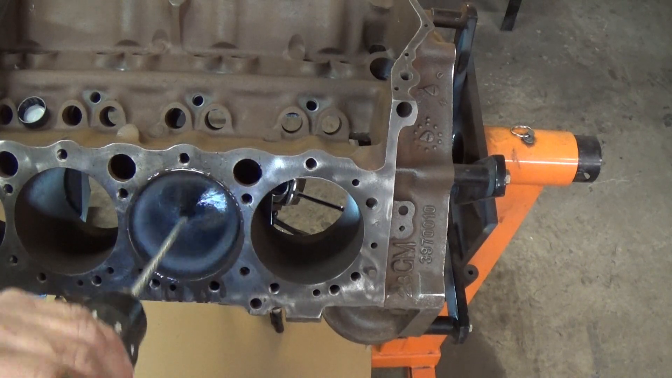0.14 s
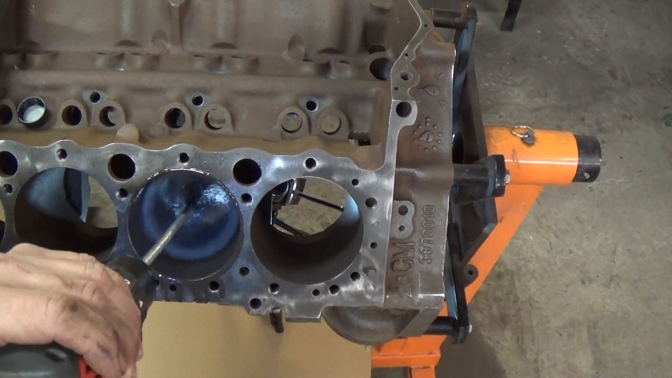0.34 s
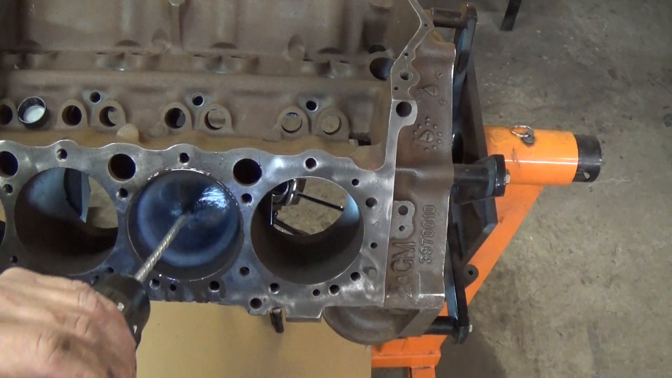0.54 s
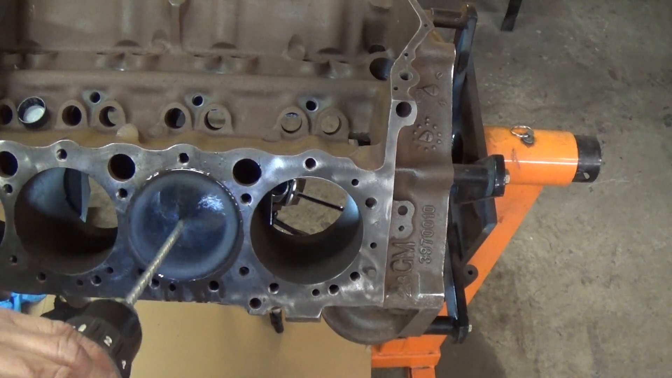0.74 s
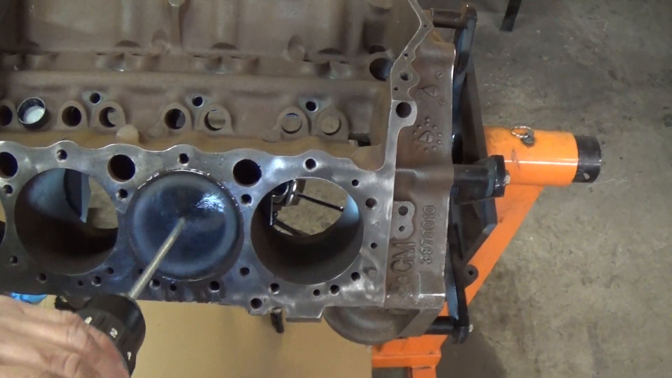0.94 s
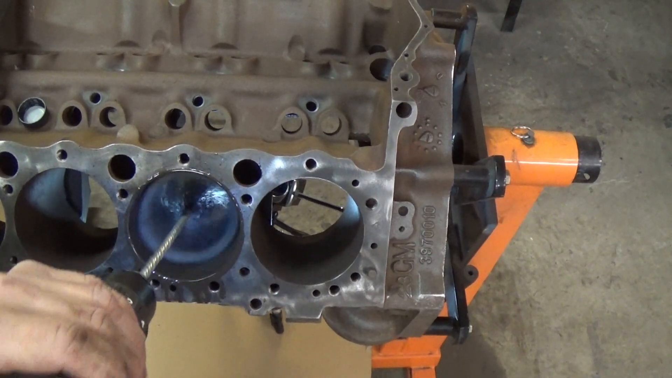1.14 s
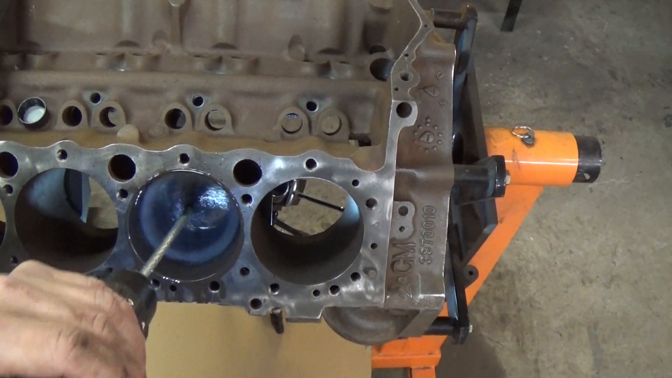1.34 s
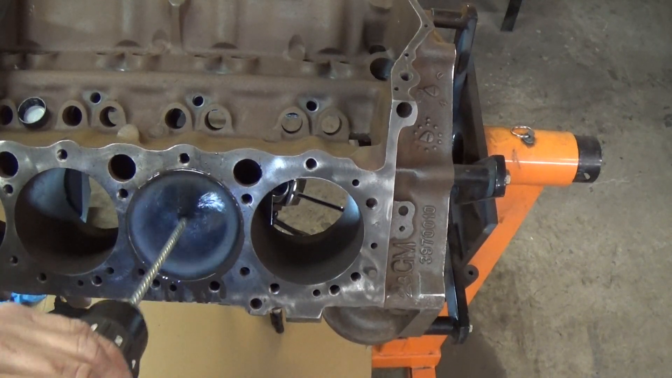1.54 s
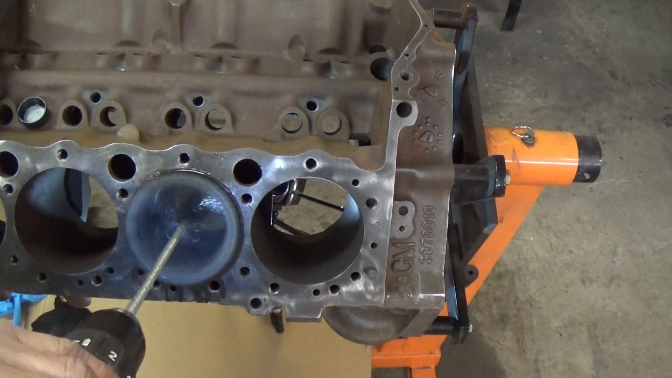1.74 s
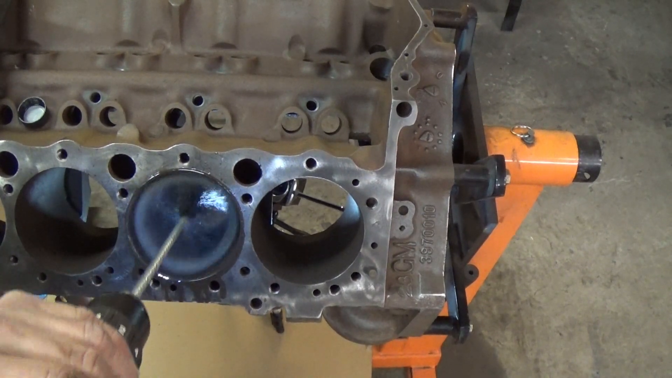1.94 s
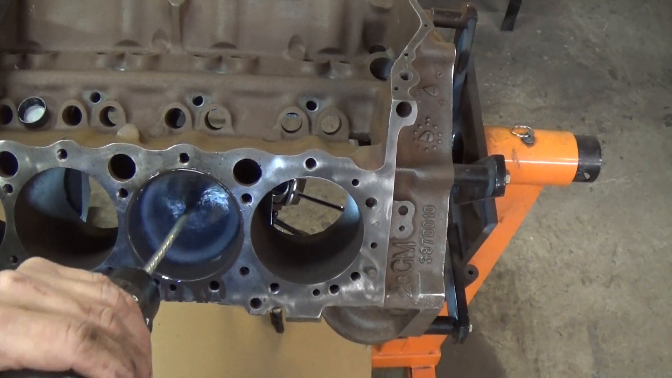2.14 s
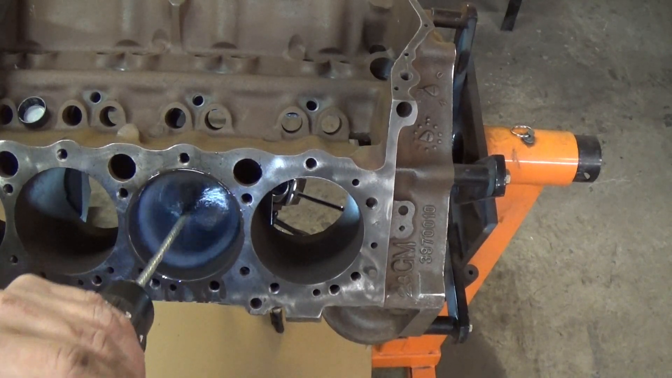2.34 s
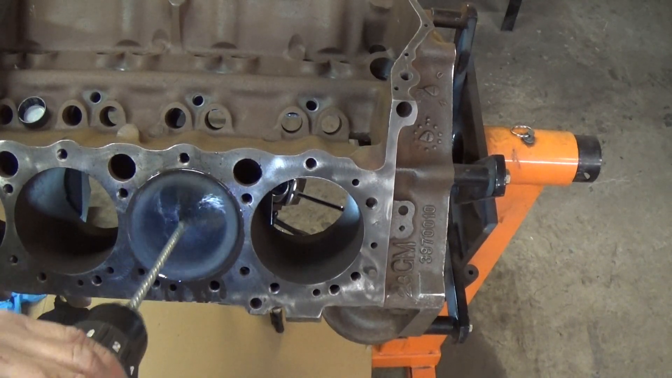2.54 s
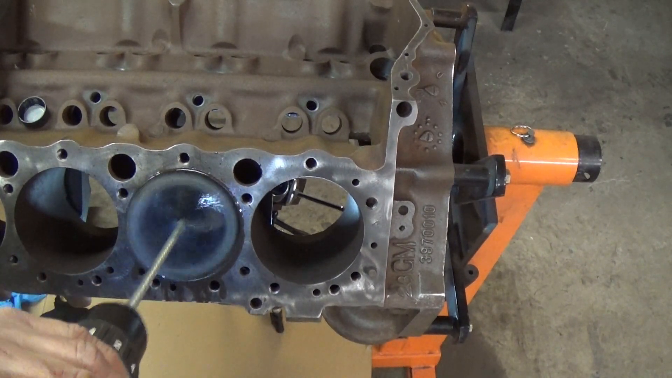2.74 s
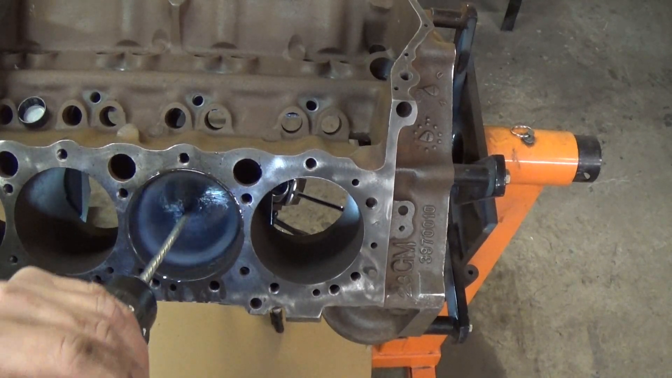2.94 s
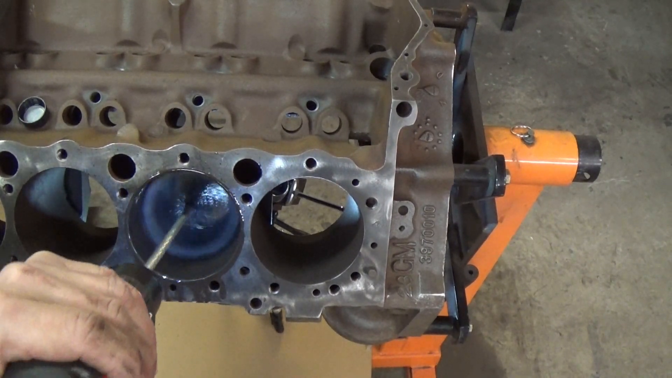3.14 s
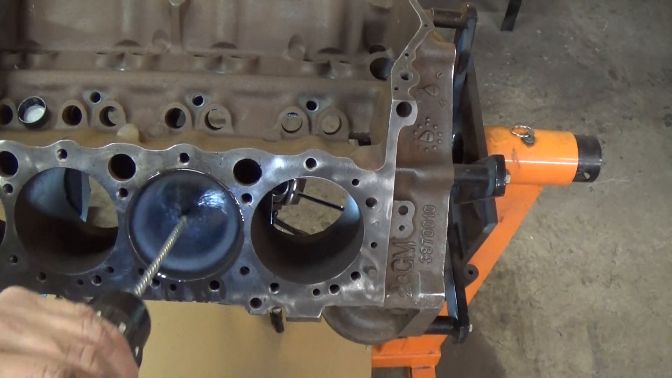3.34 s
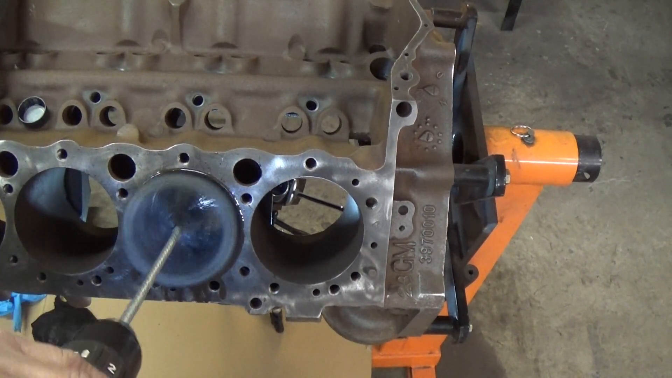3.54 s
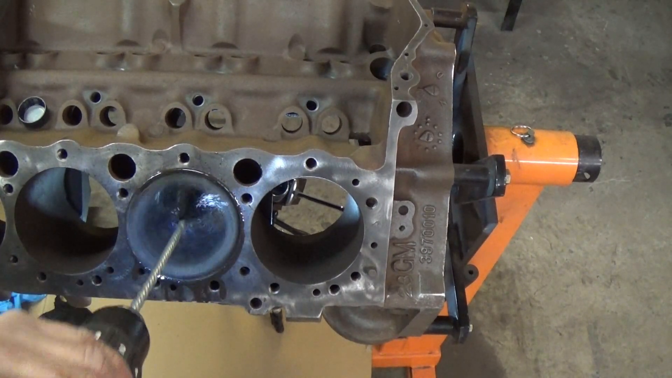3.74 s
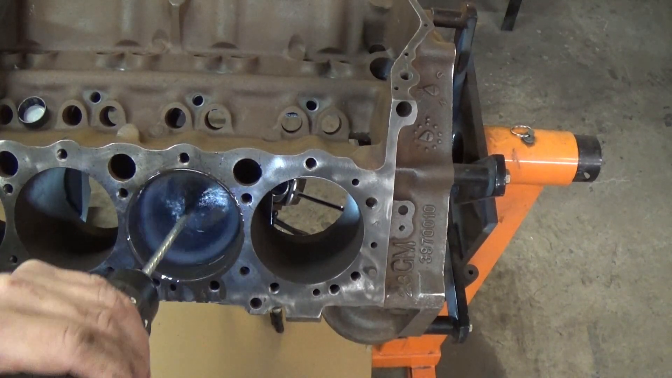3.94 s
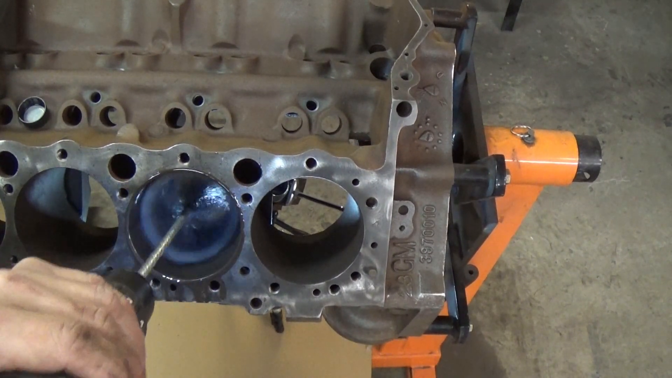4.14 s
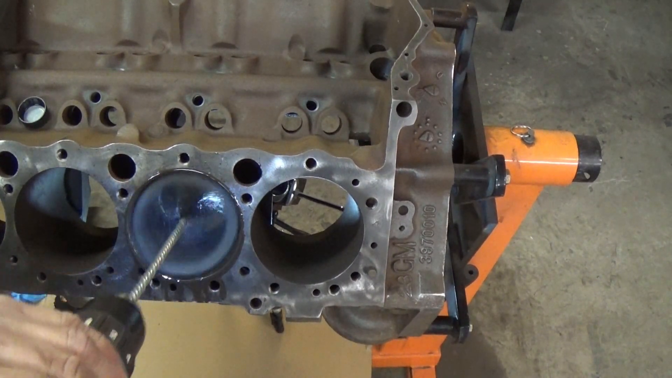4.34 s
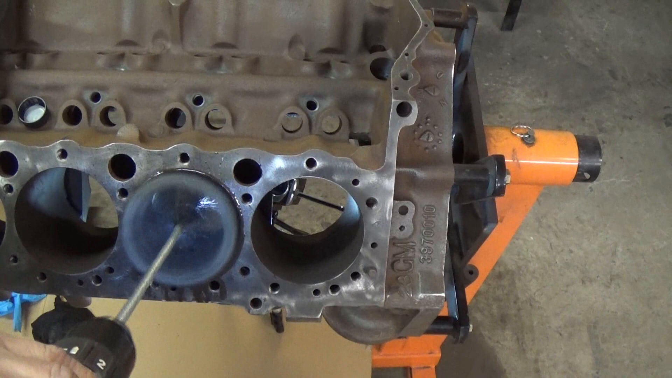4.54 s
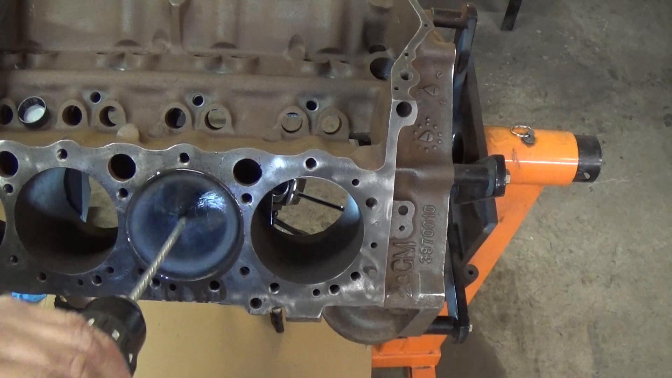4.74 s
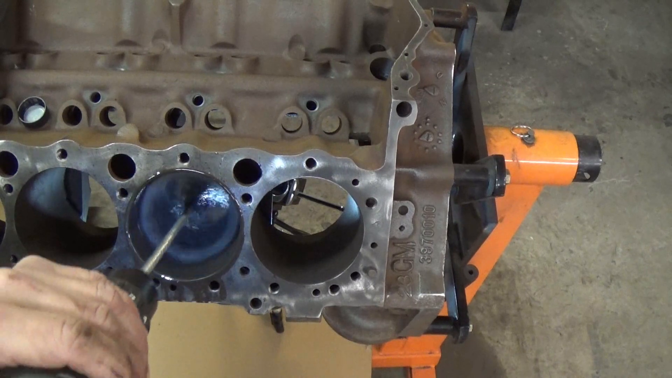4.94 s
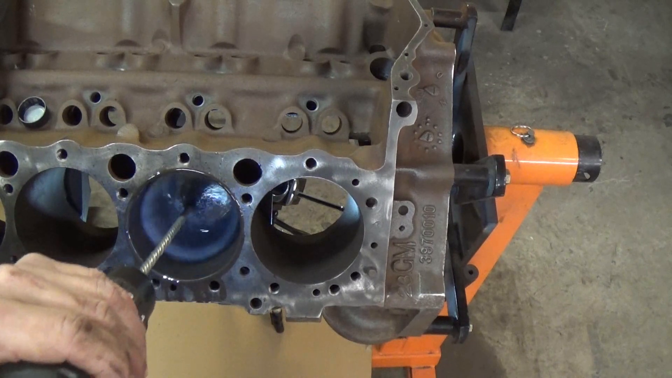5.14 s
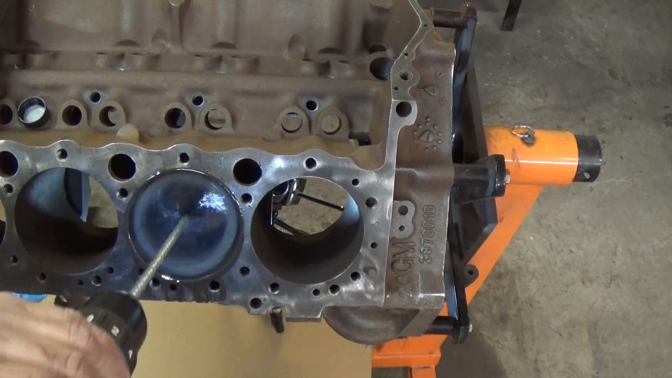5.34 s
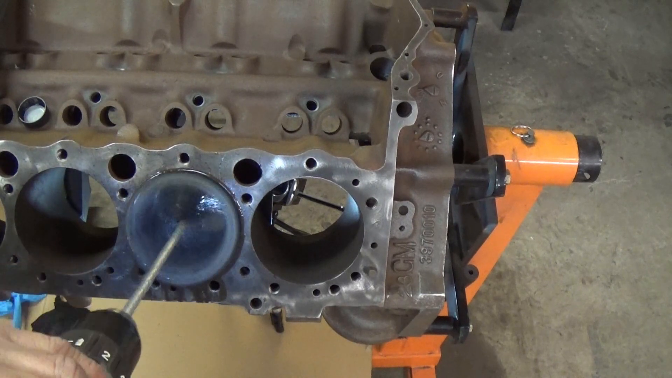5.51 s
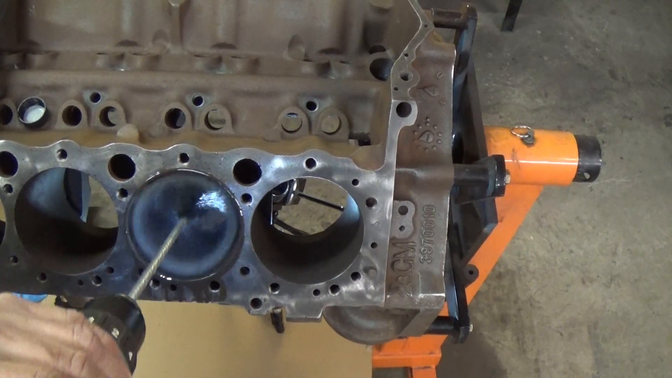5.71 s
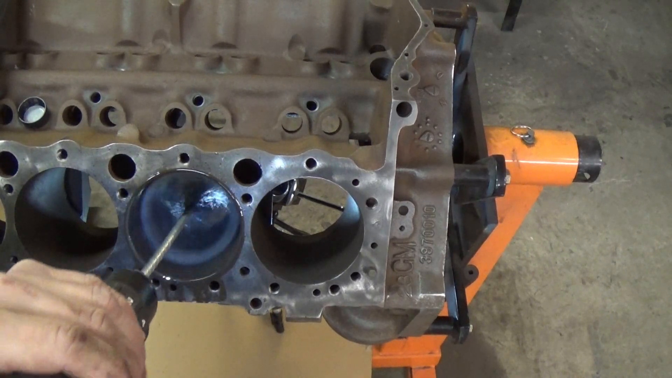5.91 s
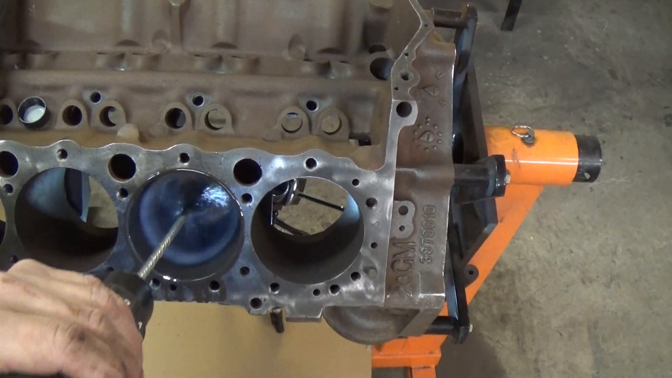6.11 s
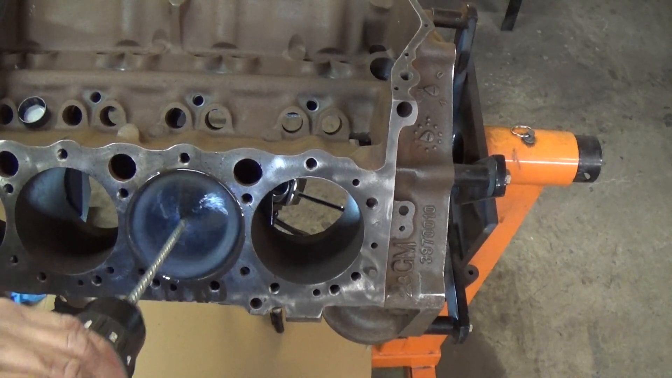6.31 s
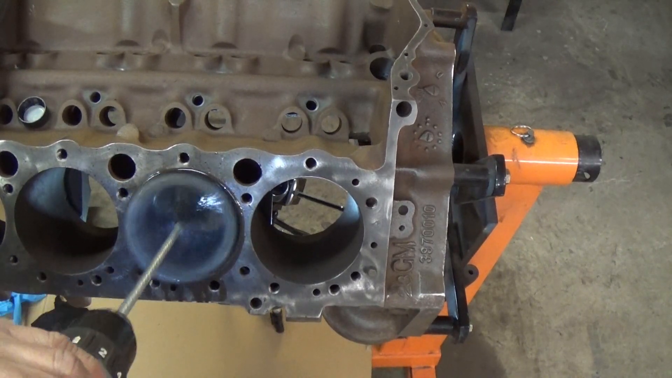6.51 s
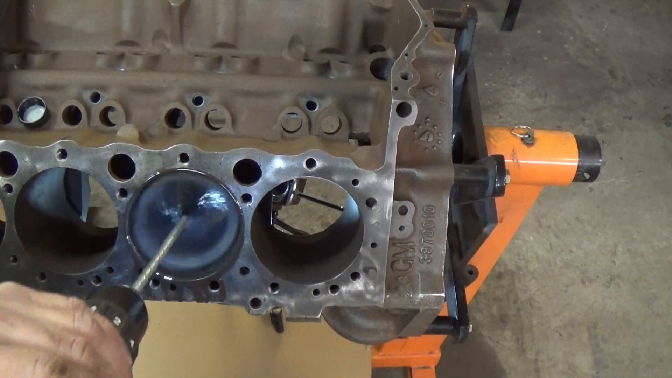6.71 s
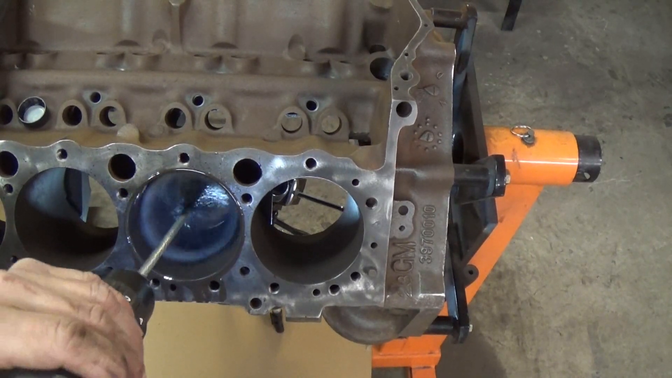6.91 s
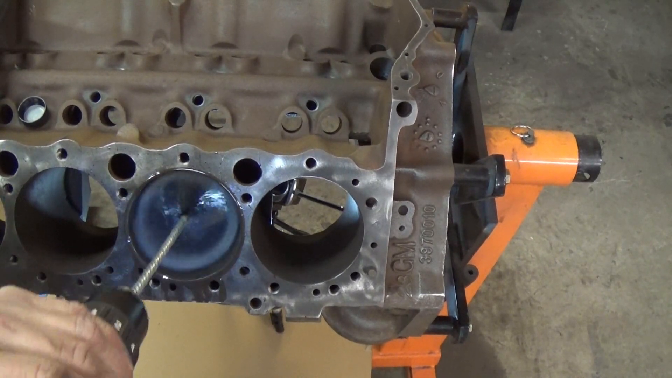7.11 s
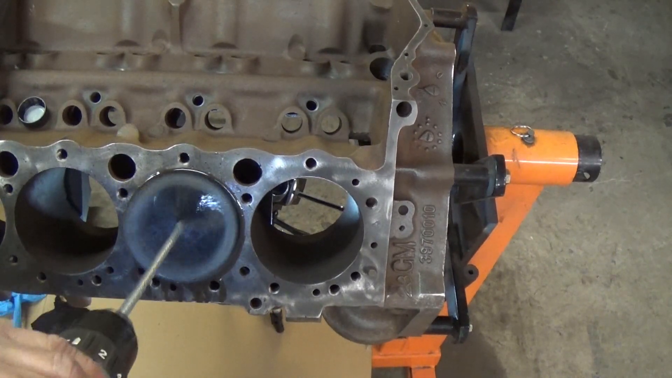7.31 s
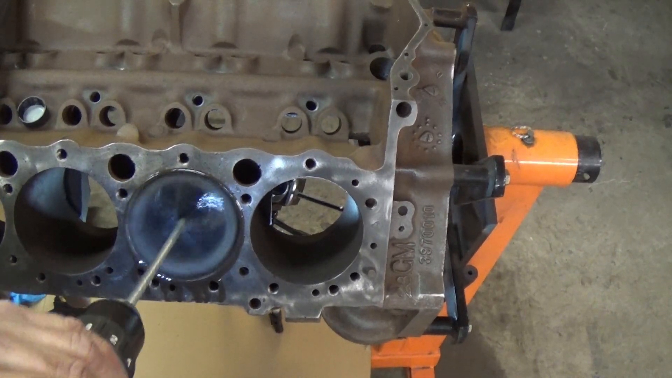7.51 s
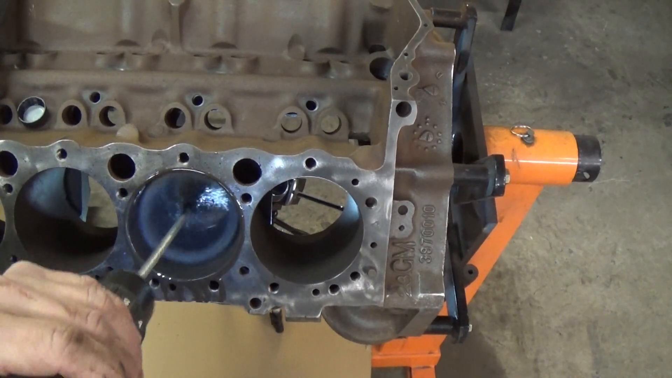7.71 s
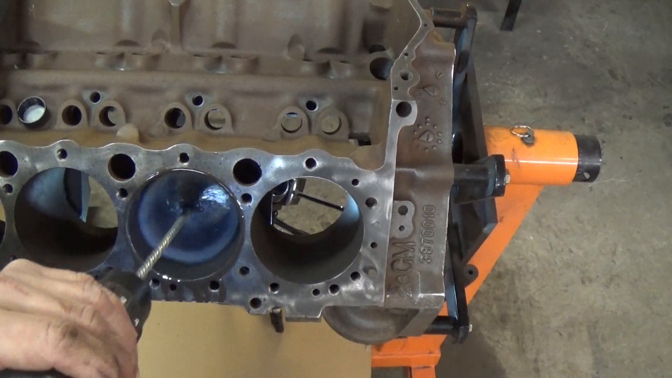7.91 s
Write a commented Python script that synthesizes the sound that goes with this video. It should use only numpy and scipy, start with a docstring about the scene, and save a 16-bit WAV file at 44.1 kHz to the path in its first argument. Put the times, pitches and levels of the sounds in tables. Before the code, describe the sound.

A few small clicks start a cordless drill, which settles into a steady, pulsing whine with rattling gears. Close by, the hone it turns scratches and hisses against an iron engine cylinder, the ringing swelling and easing with each stroke. About halfway the pitch drops in a short, labouring growl and climbs back. The honing carries on with faint low knocking, in a garage with little echo.

```python
"""In a garage, a cordless drill spins a ball hone up and down an oiled engine cylinder.
Planetary gears and motor whine and rattle, throbbing once a chuck turn; the abrasive balls sizzle on
the bore. Deep in the bore the wall rings; near the mouth the drill runs a little freer and the hone
may knock softly once a turn. Midway the drill slows and growls for half a second."""
import sys
import numpy as np
from scipy import signal
from scipy.fft import rfft, irfft
from scipy.io import wavfile
from scipy.ndimage import uniform_filter1d

SR = 44100
rng = np.random.default_rng(int(sys.argv[2]) if len(sys.argv) > 2 else 0)


def transcribe(u):
    """Save the signal u as a 16-bit wav file named by the first command-line argument.

    u: samples, shape (n,) or (channels, n), limited to [-1, 1]; the rate is SR.
    q: integer samples, one column per channel.
    """
    v = np.clip(np.atleast_2d(u).T, -1, 1)
    q = np.round(v * 32767).astype(np.int16)
    wavfile.write(sys.argv[1], SR, q)


N = 351249
TIME = np.arange(N) / SR
FREQ = np.maximum(np.arange(N // 2 + 1) * SR / N, 1)
# the drill's clock is the passing of its planet gears: passes per turn of each shaft
PASSES_PER_CHUCK, PASSES_PER_CARRIER, PASSES_PER_MOTOR = 15, 4, .8


# gear partials, three matching lists: f/cycles per planet pass; level/dB; lift at full strain/dB
TOOTH_ORDERS = [1.33, 2, 2.65, 3, 4, 5.25, 6, 8, 9, 10.5, 11, 11.5, 17.15, 20, 29]
TOOTH_DB = [-66.5, -64, -61, -45, -54, -80, -48.5, -50, -50, -53, -50, -44, -63, -49.5, -56]
TOOTH_STRAIN_DB = [-1, 6, 10, 1, -3, 1.5, 8, 3, 6.5, 12, -1, 0, -11, 2, 0]
# fader on the hum, the gear partials up to order 6: t/s, level/dB
HUM_FADER = [(.3, -2.5), (1, -1), (2, 0), (2.8, 2), (3.5, 1), (4.2, -1), (5, 0), (6.1, -0.5), (6.9, -1),
             (7.96, -1)]

def gears(rate, passes, strain):
    """Meshing teeth sing a wavering stack of partials: clean at the bottom, growling under strain."""
    out, (hum_db,) = 0, curves(HUM_FADER)
    for order, db, strain_db in zip(TOOTH_ORDERS, TOOTH_DB, TOOTH_STRAIN_DB):
        rough = min(.065 * order, .7) + .45 * strain
        level_db = db + strain_db * strain + 1.93 * drift(2.8) + hum_db * (order <= 6)
        partial = tone(order * passes, rough, flutter_hz=38.3)
        out += undb(level_db) * shell(order * rate) * partial
    return out


# motor partials, three matching lists: f/cycles per motor turn; level/dB; lift at full strain/dB
WHINE_ORDERS = [8, 9, 12, 18, 24, 27]
WHINE_PARTIAL_DB = [-8.5, -3.5, -7, -2, -3, -19]
WHINE_STRAIN_DB = [2.5, 2.5, -3, -2, 7, -5]
# fader on the whole whine: t/s, level/dB
WHINE_FADER = [(.25, -29.5), (.6, -41), (.95, -33), (2.5, -34), (3.45, -32.5), (5.1, -33.5), (7.96, -32.5)]
# extra fader on its top, order 18 and up: t/s, level/dB
WHINE_TOP_FADER = [(.7, -0.5), (1.7, 0), (2.8, 0), (3.8, -0.5), (4.7, -3), (7.96, -2.5)]

def motor(turn_hz, turns, strain, mouth):
    """Commutator and fan whine: rougher under strain, singing out when unloaded near the mouth."""
    out, (top_db,) = 0, curves(WHINE_TOP_FADER)
    for order, db, strain_db in zip(WHINE_ORDERS, WHINE_PARTIAL_DB, WHINE_STRAIN_DB):
        partial = tone(order * turns, rough=.3 + .54 * strain, flutter_hz=2.8 * order)
        level_db = db + strain_db * strain + top_db * (order >= 18)
        out += undb(level_db) * shell(order * turn_hz) * partial
    return out * undb(curves(WHINE_FADER)[0] + 2 * mouth - 3.5 * strain)


# formants of the gearbox shell: f/Hz, width/Hz, gain/dB
SHELL_FORMANTS = [(540, 130, 6.5), (1120, 130, 5), (2300, 600, 6), (3500, 500, 3), (5350, 520, 8),
                  (6400, 450, -8)]

def shell(hz):
    """Gain of the gearbox shell for a partial gliding through it; the lows hardly radiate."""
    lift_db = sum(db / (1 + (2 * (hz - centre) / width) ** 2) for centre, width, db in SHELL_FORMANTS)
    return undb(lift_db) * hz ** 4 / (hz ** 4 + 280 ** 4)


# tone curve of the tooth clatter: f/Hz, level/dB
RATTLE_EQ = [(40, -28), (130, -30), (280, -16.5), (430, -20.5), (620, -13), (950, -6), (1450, -6.5),
             (1850, 0.5), (2500, 3), (3400, 0.5), (5500, 5.5), (8000, 2), (15000, -89)]
# modes of the drill housing and hone shank, on top of that curve: f/Hz, width/Hz, gain/dB
HOUSING_MODES = [(550, 75, 2), (875, 28, 0), (1075, 75, 8.5), (1260, 18, 10.5), (1400, 11, 1),
                 (1700, 150, 3.5), (1800, 19, -8), (2500, 55, 2), (2570, 105, 5.5), (3070, 230, 4),
                 (3700, 28, 7)]

def rattle(turns):
    """Gear teeth clatter in step with the motor and ring the housing."""
    hits = grains(per_s=5000, spread_db=3.5) * swell(turns, depth_db=2.5, at=.19)
    housing = 1 + sum((undb(db) - 1) * resonance(hz, width) for hz, width, db in HOUSING_MODES)
    return unit_rms(filtered(hits, eq(RATTLE_EQ) * housing), band_hz=(1300, 1900))


# free-running speed, as the rate of planet passes: t/s, f/Hz
CRUISE_SPEED = [(.6, 268.8), (2.1, 264.7), (3.4, 264.5), (4.4, 265.8), (6, 264.45), (7.96, 263.6)]
# upstrokes, where the hone nears the mouth and drags less: t/s, speed gain/Hz, height/full stroke
MOUTH_STROKES = [(.943, 1.65, .4), (1.83, 2.8, 1.1), (2.805, 3.13, 1.2), (4.685, 6.5, 0.83),
                 (5.67, 3.9, 0.55), (6.61, 3.14, 0.36), (7.5, 3.26, 0.42)]

def speed():
    """Planet passes a second: the drill winds up, gains a little on each upstroke and sags once."""
    free = curves(CRUISE_SPEED)[0] + sum(hz * bump(s, .122) for s, hz, _ in MOUTH_STROKES)
    wound_up = 1 - np.exp(-(since(.061) / .098) ** 1.39)  # S-curve from the trigger pull
    sag_hz = 88 * (1 - np.exp(-since(3.541) / .114))
    sag_release = np.exp(-(since(3.891) / .081) ** 1.39)
    return free * wound_up - sag_hz * sag_release


def drive(rate):
    """Gain on the partials: the torque of speeding up presses the teeth together; slow turns are quiet."""
    acceleration = uniform_filter1d(np.gradient(rate) * SR, size=2600)
    torque = np.clip(acceleration / 1200, 0, 1)
    return undb(5.5 * torque ** 2) * np.minimum(rate / 182, 1) ** 4


def throb(chuck, carrier):
    """The off-centre hone loads the gears once a turn; the planet carrier adds a faster flutter."""
    pulse = swell(chuck, depth_db=2.73 + .5 * drift(1.2), at=.052)
    double_pulse = swell(2 * chuck, depth_db=1.55, at=.43)
    return pulse * double_pulse * swell(carrier, depth_db=.9, at=.14)


# tone curve of grit on the cylinder wall: f/Hz, level/dB
SIZZLE_EQ = [(300, -59), (1500, -56), (3000, -10.5), (5000, -5), (7000, -1.5), (8200, 2.5), (10000, 3.5),
             (11500, 0), (12800, -6), (14200, -14), (15800, -20)]

def sizzle(chuck, strain):
    """Each abrasive ball scratches in short spurts; the same balls catch again on every turn."""
    balls = rng.standard_normal(120)
    balls = uniform_filter1d(balls, size=3, mode="wrap") - uniform_filter1d(balls, size=21, mode="wrap")
    catch = np.interp(chuck % 1, np.linspace(0, 1, len(balls)), balls / np.std(balls))
    spurt_db = 2.3 * catch + 2.2 * drift(660) + drift(31)
    scratch, edges_hz = 0, [100, 4500, 7500, 9800, 11800, 17000]
    for low, high in zip(edges_hz, edges_hz[1:]):
        # coarse and fine grit catch at moments of their own, the finest most abruptly
        grit = grains(per_s=16000, spread_db=2)
        grit *= undb(spurt_db + high / 2300 * np.tanh(.6 * drift(630)))
        grit = np.tanh(grit / np.std(grit) / 5.5)  # springy bristles give way under the hardest bites
        scratch += filtered(grit, eq(SIZZLE_EQ) * (FREQ >= low) * (FREQ < high))
    bite = swell(chuck, depth_db=1.17 + 1.7 * strain, at=.59)  # hardest while the gears are relieved
    return unit_rms(scratch, band_hz=(7000, 13000)) * bite


# modes of the cast-iron wall: f/Hz, width/Hz, level/dB
WALL_MODES = [(2840, 31, -10), (3274, 100, -5.5), (3450, 27, 3.5), (3930, 110, 0), (4120, 130, 1.5),
              (4410, 110, 2), (4545, 58, 4.5), (4950, 180, -7), (5500, 130, -9)]
# downstrokes, where the hone is deep: t/s, lift of the ring/dB, half length/s
DEEP_STROKES = [(.45, 8, 0.18), (1.343, 4.5, 0.14), (2.294, 7.5, 0.21), (3.21, 9, 0.15), (4.135, 7.5, .14),
                (5.16, 7, 0.14), (6.137, 8.5, 0.091), (7.064, 5, 0.089), (7.884, 5, .12)]

def bore_ring():
    """The balls drum on the cylinder wall, which rings most when the hone is deep."""
    drumming = grains(per_s=6000, spread_db=-.5)
    lift_db = sum(db * bump(s, half_s) for s, db, half_s in DEEP_STROKES)
    return unit_rms(filtered(drumming, modes(WALL_MODES))) * undb(lift_db)


# low body modes of the engine block: f/Hz, width/Hz, level/dB
BLOCK_MODES = [(66, 23, -22), (162, 20, -0.5), (221, 25, -3.5), (264, 37, -16), (345, 120, -20)]

def knocks(chuck, contact_s=.0013, chatter_s=.016):
    """The hone thuds on the block once a turn, each hit with a short tail of chatter."""
    t = TIME[:SR // 4]
    turn = np.floor(chuck - .15)
    blows = np.diff(turn, prepend=turn[0]) * undb(2.6 * rng.standard_normal(N))
    push, tail = (signal.fftconvolve(blows, np.exp(-t / s))[:N] for s in (contact_s, chatter_s))
    force = .096 * push + .16 * tail * rng.standard_normal(N)
    return unit_rms(filtered(force, modes(BLOCK_MODES)))


def rumble(chuck):
    """The hone rubs against the block, swelling once a turn."""
    return noise(modes(BLOCK_MODES)) * swell(chuck, depth_db=3, at=.17)


# spells of wobble: t of the peak/s, level/dB, attack/s, release/s
WOBBLE_CUES = [(.65, -63, .08, .05), (1.02, -50.5, 0.14, 0.047), (1.86, -48.5, 0.13, 0.13),
               (2.87, -52, 0.028, .04), (3.54, -61, .03, .05), (5.74, -46, 0.14, 0.068),
               (6.69, -47, 0.15, 0.06), (7.57, -43, 0.15, .05)]

def wobble(chuck):
    """The hone wobbles against the block: knocks and rumble build up and die away in spells."""
    envelope = sum(undb(db) * np.exp(-np.maximum((s - TIME) / attack, (TIME - s) / release) ** 1.2)
                   for s, db, attack, release in WOBBLE_CUES)
    return envelope * (undb(-1) * knocks(chuck) + undb(-2) * rumble(chuck))


# handling, trigger, gears taking up slack, the hone catching: t/s, peak/dB, f/Hz, width/Hz, decay/s
CLACK_CUES = [(0.0042, -27, 260, 300, 0.016), (0.0095, -41, 85, 210, .06), (0.0088, -30, 1700, 1200, 0.012),
              (0.031, -20, 7100, 9300, 0.0024), (0.099, -15, 1120, 250, 0.0023),
              (0.089, -17.5, 2200, 2500, 0.0023), (0.088, -26.5, 550, 210, 0.0094),
              (0.12, -13.5, 1950, 860, 0.0069), (1.318, -10, 3800, 2100, 0.017)]

def clacks():
    """Short blows, each ringing one broad resonance of the drill."""
    out = 0
    for s, db, hz, width, decay in CLACK_CUES:
        blow = rng.standard_normal(N) * (TIME >= s) * np.exp(-since(s) / decay)
        clack = filtered(blow, resonance(hz, width) ** 2)
        out += undb(db) * clack / np.abs(clack).max()
    return out


# tone curve of the garage's background: f/Hz, level/dB
ROOM_TONE_EQ = [(25, -9), (65, -3.5), (110, -7), (300, -0.5), (700, 5), (2500, 10.5), (4000, 1.5),
                (15000, -11.5)]

def room_tone():
    """A faint, steady bed of hiss under the work."""
    return undb(-45.5) * noise(eq(ROOM_TONE_EQ))


def garage(x, t60_s, wet_db, left_db):
    """Stereo: the direct sound plus a short, thin, bright wash off floor and walls, unlike at each ear."""
    colour = eq([(100, -32), (400, -10), (1200, -2), (4500, -6.5), (9000, 2), (13000, -1)])
    out = []
    for side in (1, -1):
        tail = rng.standard_normal(N) * undb(-60 * TIME / t60_s) * (TIME > .004)
        tail = filtered(tail / np.linalg.norm(tail), colour)[:SR // 2]
        out.append(x * undb(side * left_db) + undb(wet_db) * signal.fftconvolve(x, tail)[:N])
    return np.array(out)


def tone(cycles, rough, flutter_hz):
    """A partial of rms 1 that flutters in level and phase."""
    flutter = 1 + rough * (drift(flutter_hz) + 1j * drift(flutter_hz))
    return np.sqrt(2) * np.real(flutter * np.exp(2j * np.pi * cycles)) / np.sqrt(1 + 2 * rough ** 2)


def grains(per_s, spread_db):
    """Tiny impacts of uneven strength at random moments, rms 1."""
    hardness = np.minimum(rng.exponential(size=N), 3)
    x = (rng.random(N) < per_s / SR) * rng.choice([-1, 1], N) * undb(spread_db * hardness)
    return x / np.std(x)


def noise(colour):
    """Coloured noise of rms 1."""
    x = filtered(rng.standard_normal(N), colour)
    return x / np.std(x)


def drift(hz):
    """Smooth random modulation of rms 1, rolling off above hz."""
    return noise(1 / (1 + (FREQ / hz) ** 4))


def swell(turns, depth_db, at):
    """Tremolo once a turn, peaking at the fraction 'at' of the turn."""
    return undb(depth_db * np.cos(2 * np.pi * (turns - at)))


def bump(s, half_s):
    """A smooth rise to 1 and fall around a moment."""
    return np.exp(-((TIME - s) / half_s) ** 2)


def since(s):
    """Seconds since a moment, 0 before it."""
    return np.maximum(TIME - s, 0)


def curves(table):
    """Automation lanes: each column after the first, ramped between its times."""
    s, *columns = np.transpose(table)
    return [np.interp(TIME, s, c) for c in columns]


def eq(points):
    """Frequency response through points of f/Hz, level/dB."""
    hz, db = np.transpose(points)
    return undb(np.interp(np.log(FREQ), np.log(hz), db))


def resonance(hz, width):
    """Response of one damped mode, 1 at its centre."""
    return 1 / (1 + 1j * (FREQ ** 2 - hz ** 2) / (FREQ * width))


def modes(table):
    """Response of a ringing body, the sum of its modes."""
    return sum(undb(db) * resonance(hz, width) for hz, width, db in table)


def filtered(x, response):
    """Pass a sound through a frequency response."""
    return irfft(rfft(x) * response, N)


def unit_rms(x, band_hz=(20, 20000)):
    """Scale to rms 1 within a band."""
    return x / np.std(filtered(x, (FREQ > band_hz[0]) & (FREQ < band_hz[1])))


def undb(db):
    """Decibels to gain."""
    return 10 ** (np.asarray(db) / 20)


def scene():
    """One speed turns motor, gears and hone; the strokes and the strain ride their levels."""
    rate = speed()
    passes = np.cumsum(rate) / SR
    passes -= np.interp(.1, TIME, passes)  # count from when the gears have taken up their slack
    passes += .018 * drift(6.35)  # the shaft runs a little ahead and behind
    chuck, rotor = passes / PASSES_PER_CHUCK, passes / PASSES_PER_MOTOR

    strain = np.clip((262 - rate) / 65, 0, 1)  # labouring at low speed
    mouth = sum(height * bump(s, .14) for s, _, height in MOUTH_STROKES)  # nearness to the bore's mouth
    judder = bump(.161, .028)  # gears and bristles shudder as the hone gets going
    fade_in = np.clip((TIME - .08) / .02, 0, 1) ** 2
    # near the mouth the bore guides the hone less, so it throbs harder
    load = throb(chuck, passes / PASSES_PER_CARRIER) ** (.88 + .28 * mouth)

    rattle_db = -44.5 + 3.5 * mouth + 1.5 * strain + 10 * judder
    ring_db = -32.5 - 3 * mouth + 4 * strain + 8.5 * judder
    sizzle_db = -21 - 1.2 * mouth - 4.5 * strain
    partials = gears(rate, passes, strain) + motor(rate / PASSES_PER_MOTOR, rotor, strain, mouth)
    drill = (drive(rate) * partials + rattle(rotor) * undb(rattle_db)) * load
    hone = bore_ring() * undb(ring_db) * load + sizzle(chuck, strain) * undb(sizzle_db)

    drill_bus = garage(fade_in * drill + clacks(), t60_s=.21, wet_db=-6.5, left_db=.86)
    hone_bus = garage(fade_in * hone + wobble(chuck), t60_s=.15, wet_db=-16, left_db=.45)
    return drill_bus + hone_bus + garage(room_tone(), t60_s=.41, wet_db=-6, left_db=-.6)


def record(dry, top_hz=15750):
    """A steep low-pass takes the very top off the mix."""
    return signal.sosfilt(signal.ellip(10, .1, 80, top_hz, fs=SR, output="sos"), dry)


dry = scene()
out = record(dry)
transcribe(out)
```